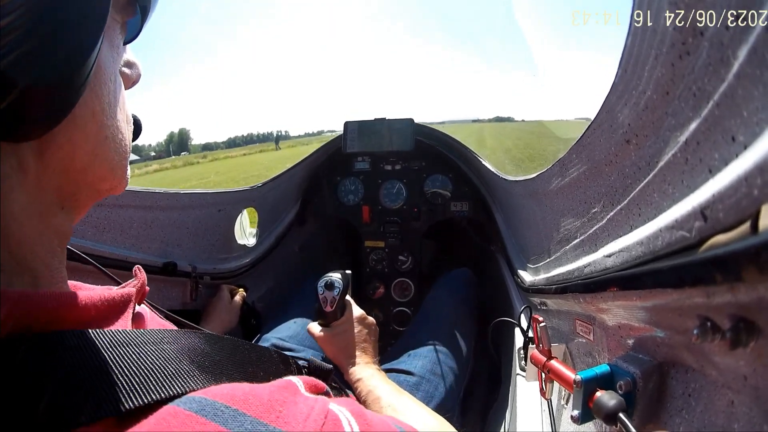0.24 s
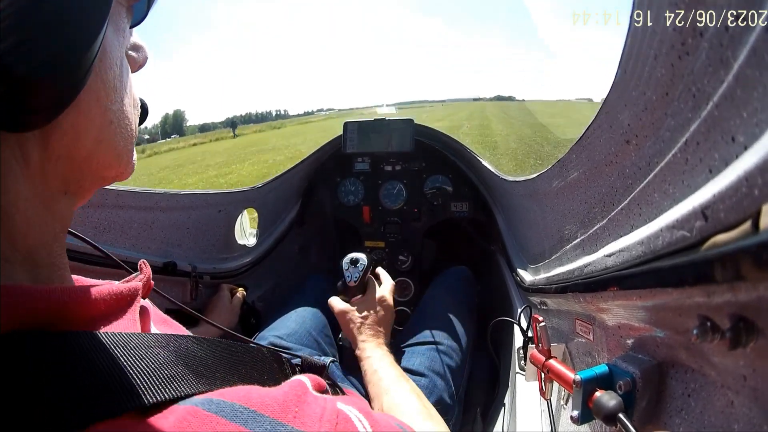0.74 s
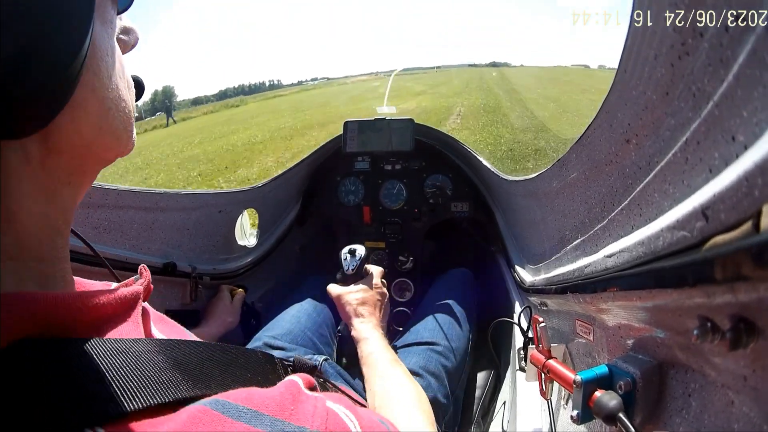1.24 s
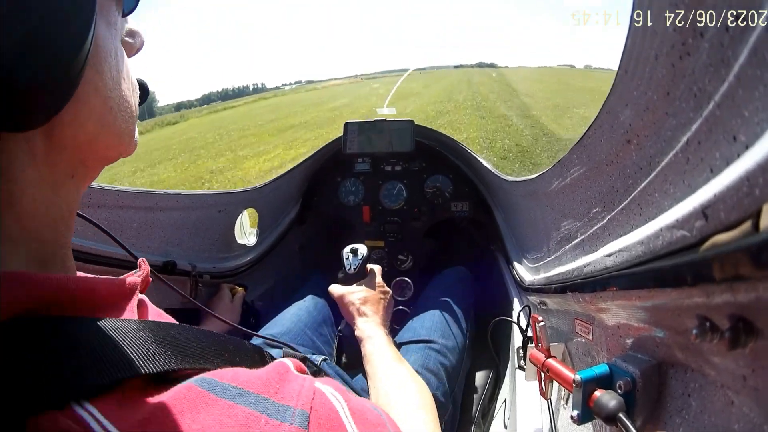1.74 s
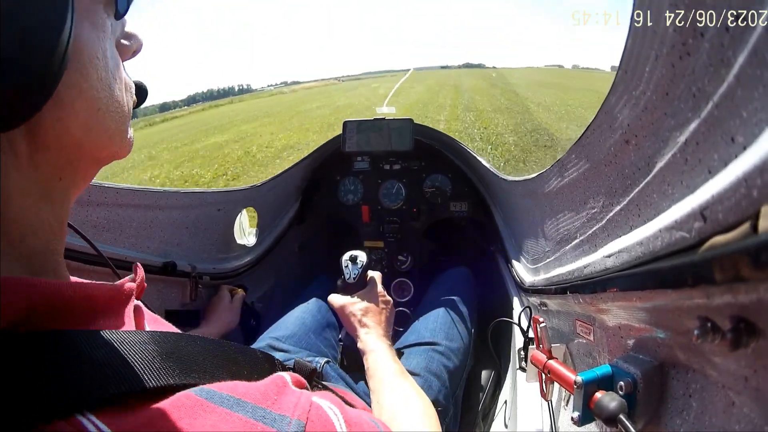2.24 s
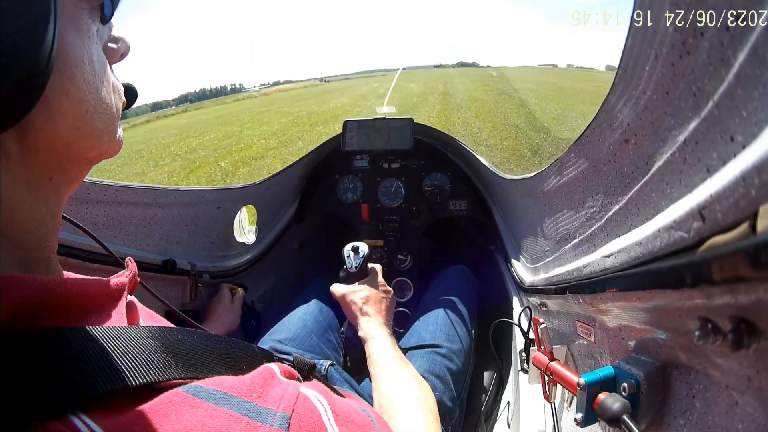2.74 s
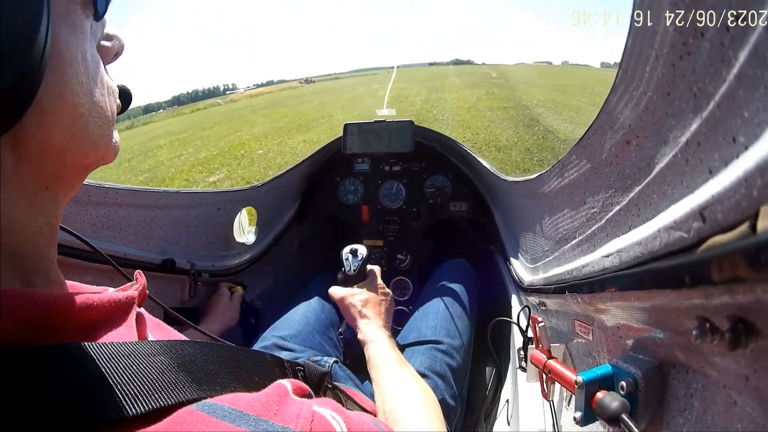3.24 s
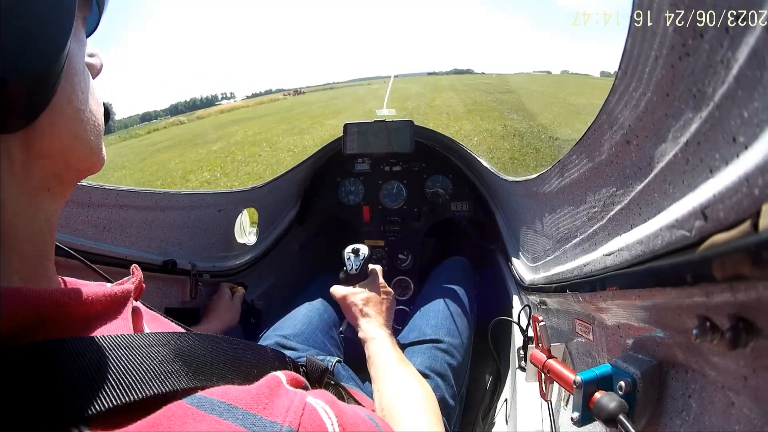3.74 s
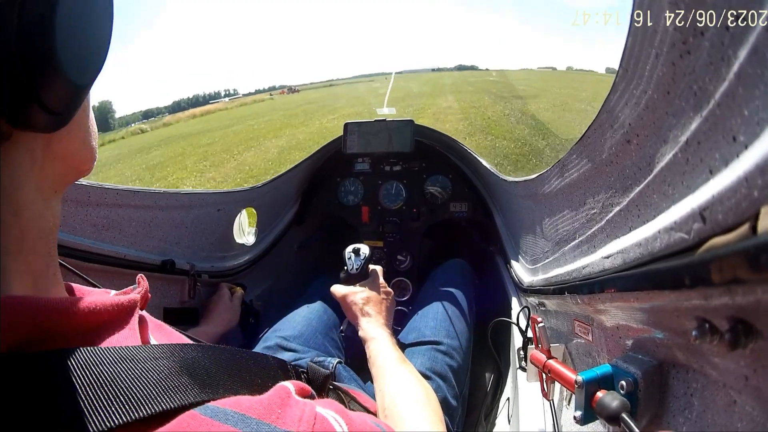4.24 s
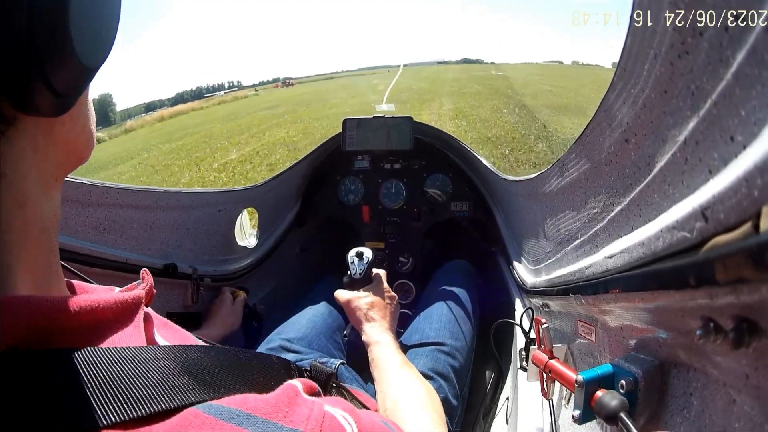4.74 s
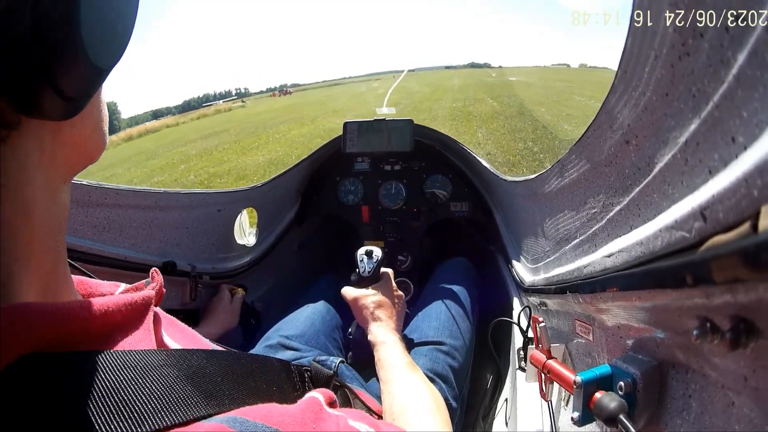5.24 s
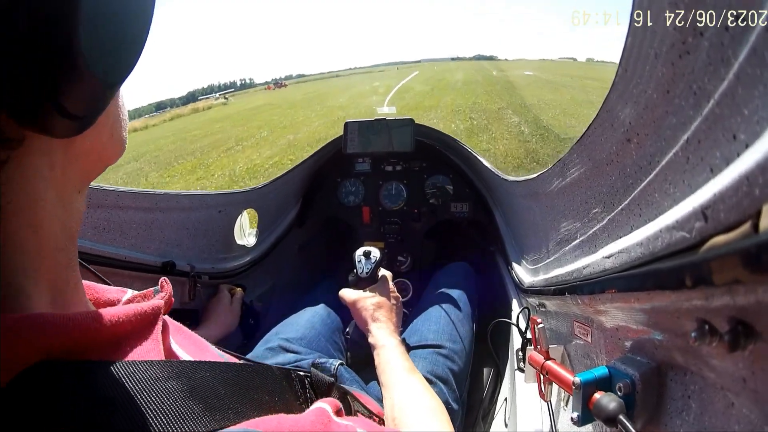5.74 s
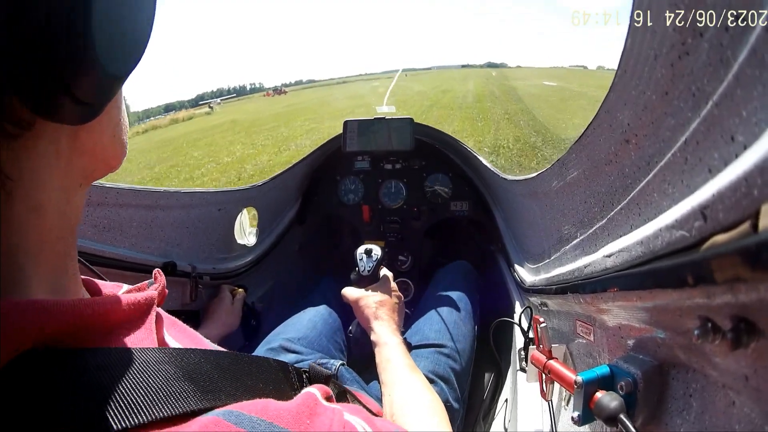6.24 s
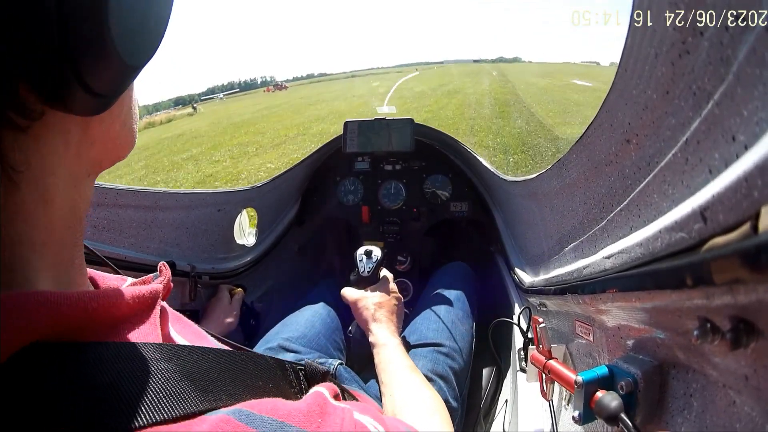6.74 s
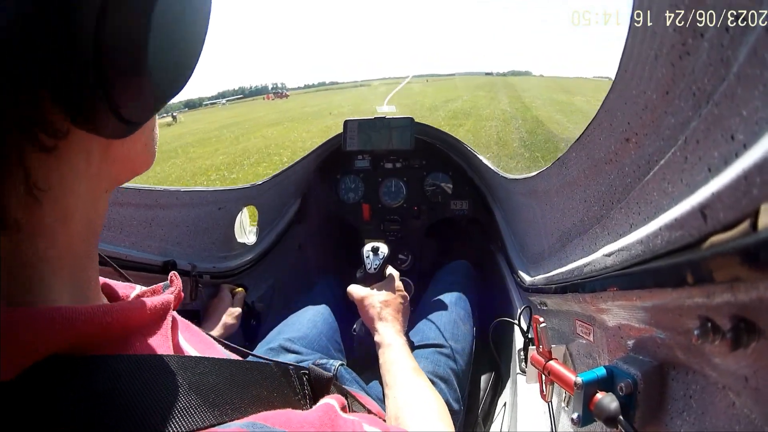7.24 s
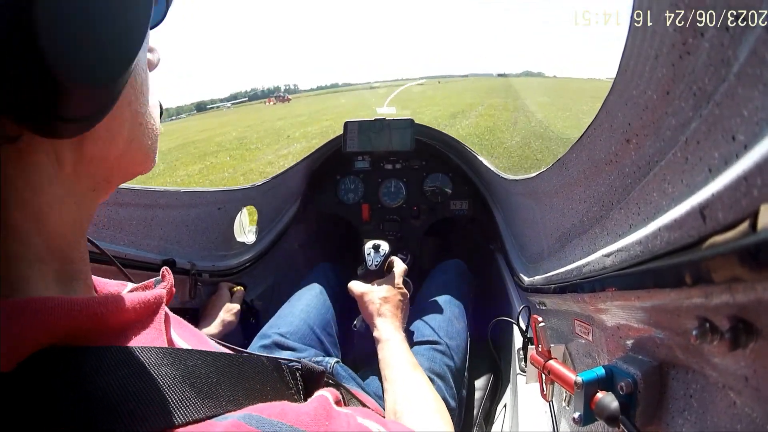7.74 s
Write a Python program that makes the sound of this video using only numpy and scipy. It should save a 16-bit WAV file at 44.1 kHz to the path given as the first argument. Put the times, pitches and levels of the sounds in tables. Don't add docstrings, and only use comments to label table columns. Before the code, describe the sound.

Inside a small aircraft cockpit rolling over rough grass, low rumble and wind rush, rapid loose rattling and hollow knocks, easing toward a sparse idle hum.

```python
import sys
import numpy as np
from scipy import signal
from scipy.fft import rfft, irfft
from scipy.io import wavfile
from scipy.ndimage import uniform_filter1d

SR = 44100
rng = np.random.default_rng(int(sys.argv[2]) if len(sys.argv) > 2 else 0)


def dump_mix(stems):
    frames = np.atleast_2d(stems).T
    limited = np.clip(frames, -1, 1)
    pcm = np.round(limited * 32767).astype(np.int16)
    wavfile.write(sys.argv[1], SR, pcm)


def elevation(decibels):
    levels = np.asarray(decibels, float)
    return 10 ** (levels / 20)


N = 352800


def evened(x):
    return x / np.sqrt(np.mean(x ** 2) + 1e-20)


def curves(rows):
    start_s, *columns = np.transpose(rows)
    return [np.interp(np.arange(N) / SR, start_s, column) for column in columns]


def drift(hz):
    lowpass = signal.butter(2, hz, fs=SR, output="sos")
    return evened(signal.sosfilt(lowpass, rng.standard_normal(N)))


def add(mix, start_s, sound):
    part = mix[max(round(start_s * SR), 0):][:len(sound)]
    part += sound[:len(part)]


def shaken(resonances):
    hz = np.fft.rfftfreq(N, 1 / SR)
    ring = 0
    for center_hz, width_hz, level_db in resonances:
        drive = rfft(rng.standard_normal(N))
        ring = ring + elevation(level_db) * drive / (1 + ((hz - center_hz) / width_hz) ** 2)
    return evened(irfft(ring, N))


def struck(modes, seconds, phases, contact_s):
    t = np.arange(round(seconds * SR)) / SR
    ring = 0
    for (hz, level_db, t60_s), phase in zip(modes, phases):
        ring = ring + elevation(level_db - 60 * t / t60_s) * np.sin(2 * np.pi * (hz * t + phase))
    return ring * np.sin(np.pi / 2 * np.minimum(t / (contact_s + 1e-6), 1)) ** 2


# middle_s, length_s, fuselage_rise_db, gear_rise_db
HUMPS = [(0, .2, -1.5, 11.5), (0.19, 0.067, 3.5, 3), (0.866, 0.74, -1, 2), (1.22, .3, 13, 8.5),
         (1.458, 0.3, -5.5, -9), (1.617, .16, 8.5, -19), (2.03, 0.52, 2, 7.5), (2.483, 0.13, 4, 11.5),
         (2.59, 0.46, 3.5, 2), (2.986, .18, 1, -1), (3.09, 0.29, -3.5, -14), (3.178, 0.16, 12, 2),
         (3.446, 0.098, 3, -2), (3.618, 0.18, -3.5, 2), (3.862, 0.33, 4.5, -5.5), (4.2, .2, 2, 0),
         (4.445, 0.083, 1.5, 0), (4.562, 0.13, 5, 0), (4.641, 0.15, -29, -1), (4.823, 0.14, 4.5, 16),
         (4.995, 0.26, 1, 8), (5.174, .3, 3, 6.5), (5.5, 0.15, -1, -4), (5.749, 0.16, 7.5, -16),
         (6.126, 0.22, -5.5, -17), (6.72, 0.17, 4.5, -1.5), (7.075, 0.39, 3, 4), (7.42, 0.9, -4, -0.5),
         (7.594, 0.22, 11, 3), (8, 0.31, -7, -2)]


def humps():
    t = np.arange(0, N, 64) / SR
    rise_db = 0
    for start_s, length_s, *peak_db in HUMPS:
        arch = np.cos(np.pi * np.clip((t - start_s) / length_s, -.5, .5)) ** 2
        rise_db = rise_db + np.outer(peak_db, arch)
    return [np.interp(np.arange(N) / SR, t, r) for r in rise_db]


# start_s, shake_db
SHAKE = [(0, -0.5), (.9, 0.5), (1.5, 1.5), (2.6, 0.5), (3.9, 0.5), (4.4, -2), (5.0, -.5), (5.5, -2.5),
         (6.2, -3), (7.0, -3.5), (8, -4)]


def loads(fuselage_db, gear_db):
    shake_db, = curves(SHAKE)
    boom_db = -25.5 + 1.56 * shake_db + fuselage_db
    thud_db = -32 + 0.77 * shake_db + gear_db
    rush_db = -25 + shake_db + 0.27 * fuselage_db
    wing_db = -27.5 + 1.3 * shake_db + 0.05 * fuselage_db + 0.49 * gear_db
    return boom_db, thud_db, rush_db, wing_db


# pitch_hz, density_db_per_hz
RUSH = [(30, -18), (100, -3.5), (240, -9), (420, -6), (600, -12), (900, -20), (1150, -22.5), (2000, -35),
        (2900, -56.5), (4000, -58), (6000, -68.5)]


def rush():
    frames, hz = N // 128 + 8, np.fft.rfftfreq(512, 1 / SR)
    real, imag, patches = rng.standard_normal((frames, len(hz), 3)).T
    patches = uniform_filter1d(patches, size=5, axis=0)
    patches = evened(uniform_filter1d(patches, size=14, axis=1))
    pitch_hz, density_db = np.transpose(RUSH)
    slope_db = np.interp(np.log(hz + 1), np.log(pitch_hz), density_db)[:, None]
    spectrum = (real + 1j * imag) * elevation(slope_db + 1.88 * patches)
    return evened(signal.istft(spectrum, nperseg=512, noverlap=384)[1][:N])


# center_hz, width_hz, level_db
AIRFRAME = [(184.9, 16.5, 2), (240.2, 43, 0.5), (303, 9.3, -15)]
# center_hz, width_hz, level_db
GEAR = [(36.5, 31, -5), (50.3, 11, -2.5)]
# center_hz, width_hz, level_db
WING = [(117, 26, 0.5)]


def rolling():
    boom_db, thud_db, rush_db, wing_db = loads(*humps())
    jolts = drift(hz=23.7)
    boom = elevation(boom_db + 2.8 * jolts) * shaken(AIRFRAME)
    drum = elevation(wing_db) * shaken(WING)
    thud = elevation(thud_db) * shaken(GEAR)
    return boom + drum + thud + elevation(rush_db + jolts) * rush()


# start_s, rate_hz, hum_db
ENGINE = [(0.0, 84.02, -25), (0.98, 83.37, -25), (2.47, 80.77, -23.5), (3.2, 75.98, -26.5),
          (3.36, 74.4, -34), (3.52, 70.43, -20), (3.62, 73.43, -40), (3.94, 70.38, -26), (4.45, 69.43, -39),
          (4.79, 69.06, -31.5), (5.57, 69.86, -36), (5.7, 73, -30), (5.9, 73.8, -30), (7.08, 67.94, -34.5),
          (7.69, 71.7, -35), (8.0, 72.6, -32.5)]


def engine():
    hz, hum_db = curves(ENGINE)
    turns = np.cumsum(hz * (1 + 0.014 * drift(hz=18)) / SR)
    idle_hz, half_db_per_hz, wander_db = 73, -0.77, 4.5
    half_db = -2 + half_db_per_hz * (hz - idle_hz) + wander_db * drift(hz=4)
    firing = np.sin(2 * np.pi * turns) + elevation(half_db) * np.sin(np.pi * turns)
    return np.sqrt(2) * elevation(hum_db) * firing


# start_s, pitch_hz, level_db
HOP = [
    (1.4, 48.0, -37),
    (1.472, 46, -25),
    (1.623, 51.47, -34),
    (2.594, 50.56, -24),
    (2.85, 46.4, -45),
]


def tyre():
    hz, level_db = curves(HOP)
    t = np.arange(N) / SR
    fade_s = 0.13
    gate = np.clip(np.minimum(t - HOP[0][0], HOP[-1][0] - t) / fade_s, 0, 1)
    return np.sqrt(2) * gate * elevation(level_db) * np.sin(2 * np.pi * np.cumsum(hz) / SR)


# start_s, blow_db, panel_hz, fuselage_share_db, brightness_db_per_octave
KNOCKS = [(1.181, -23, 520, -1, -8), (1.6, -12.5, 563, 5, -25), (2.435, -10.5, 603, 5, -8),
          (2.55, -13.5, 633, -8, -9), (3.126, -9.5, 522, -5, -6), (3.753, -10, 618, 3, -13.5),
          (3.818, -4, 540, 1.5, -4.5), (4.261, -21.5, 688, 19, -4), (4.561, -18.5, 657, 11.5, -9),
          (4.778, -16, 526, 6.5, 2), (4.802, -17.5, 778, 3, -3), (5.123, -9, 567, 5, -2),
          (5.139, -11, 543, 0.5, 2.5), (5.751, -16, 612, 12, -0.5), (5.897, -19.5, 576, 7, -2.5),
          (7.111, -8, 572, 3, -3), (1.157, -11, 480, 13, -10), (3.681, -22.5, 910, -19, 0),
          (6.853, -18, 1065, 3.5, -23), (2.172, -19.5, 530, 3, -6), (4.905, -21.5, 550, -1, -5),
          (6.176, -22, 552, 4, 0), (6.664, -27, 1065, 4, -16), (6.719, -21, 560, 7, -7)]
# pitch_factor, level_db, t60_s
PANEL = [(1.009, 1.5, 0.039), (1.39, -2.5, 0.04), (1.94, 0, 0.021), (4.2, -17, 0.0092)]
# pitch_hz, level_db, t60_s
SHELL = [(205.4, -3, 0.32), (244.8, 7, 0.075)]


def knocks():
    out = np.zeros(N)
    for start_s, blow_db, panel_hz, shell_db, bright_db in KNOCKS:
        modes = [(panel_hz * k, level_db + bright_db * np.log2(k), t60_s) for k, level_db, t60_s in PANEL]
        slap = struck(modes, 0.06, np.zeros(len(modes)), contact_s=0.0016)
        add(out, start_s - 0.0007, elevation(blow_db - 0.5) * slap)
        rebound_s = 0.00534 + 0.0032 * rng.random()
        add(out, start_s + rebound_s, -elevation(blow_db - 6.5) * slap)
        shell = struck(SHELL, 0.18, rng.random(len(SHELL)), contact_s=0.0065)
        add(out, start_s, elevation(blow_db + shell_db - 7.5) * shell)
    return out


# start_s, level_db
SNAPS = [(1.0613, -54), (1.183, -40), (1.5529, -51), (1.8522, -55.5), (2.007, -47), (2.7823, -51),
         (4.258, -56), (4.4035, -50), (4.9563, -50.5), (4.997, -55), (5.0365, -50), (5.0626, -51)]


def buckle():
    out, t = np.zeros(N), np.arange(600) / SR
    t60_s = 0.004
    for start_s, level_db in SNAPS:
        click = elevation(level_db + 6 - 60 * t / t60_s) * rng.standard_normal(len(t))
        add(out, start_s + 0.001, click)
    return signal.sosfilt(signal.butter(4, 9500, "high", fs=SR, output="sos"), out)


# start_s, tap_db, lead_in_s, tail_s
RATTLES = [(.0088, -26, 0, 0.063), (.2267, -28.5, 0.083, 0.0018), (.3447, -31.5, .058, 0),
           (.3694, -27, 0.0059, 0.02), (.4394, -28.5, 0.0022, .015), (.524, -36.5, .025, 0.029),
           (.6429, -27.5, 0.045, 0.016), (.6666, -27.5, 0, .03), (.7194, -28, 0.024, .015),
           (.845, -26.5, 0.053, .025), (.9453, -31.5, .035, .025), (1.0898, -30.5, 0.038, .025),
           (1.1838, -22.5, 0.019, 0.0029), (1.2093, -29.5, 0, .017), (1.2921, -31, 0.035, 0.012),
           (1.3222, -30.5, 0, .12), (1.5222, -27.5, 0.044, .07), (1.7817, -35.5, 0.15, .1),
           (1.9307, -29.5, 0.022, 0), (2.0061, -30, 0.016, 0.05), (2.1254, -27, 0.022, 0.0097),
           (2.2229, -27.5, 0.033, 0.025), (2.298, -29.5, 0.025, .022), (2.3389, -29.5, 0, 0),
           (2.467, -29.5, 0.034, 0.046), (2.5189, -23.5, 0.022, 0.0019), (2.5948, -29.5, 0.061, .037),
           (2.7004, -29, 0.0092, 0), (2.7955, -26.5, 0.025, 0.086), (2.927, -32.5, 0.025, .027),
           (3.0426, -27, .025, .036), (3.1372, -28.5, .03, 0.028), (3.2455, -25, .029, 0.025),
                (3.46, -28, .087, 0), (3.5323, -28, .014, .025), (3.6519, -29, 0.043, .03),
                (3.6962, -29.5, 0.032, 0.1), (3.8334, -28, 0.012, 0.086), (4.1037, -33, 0.027, .055),
                (4.2352, -28, 0.1, 0.039), (4.4044, -26, 0, 0.0071), (4.5751, -29, .085, .048),
                (4.8031, -27.5, 0.11, 0.014), (4.898, -29, 0.061, 0.012), (4.932, -28, 0.01, .05),
                (5.037, -24.5, 0.049, 0), (5.0636, -25.5, 0.0055, 0), (5.1412, -29, 0.026, .077),
                (5.33, -36, .09, 0.048), (5.4408, -29, 0, 0.0074), (5.6655, -33.5, 0.038, 0.096),
                (5.8407, -30.5, 0.0073, 0.07), (6.2814, -30, 0, 0.043), (6.4035, -39.5, 0.035, .027),
                (6.544, -33, 0, .04), (7.0545, -37.5, 0, .037), (7.145, -34.5, 0.0059, 0.029),
                (7.321, -33.5, .044, 0.0014), (7.6118, -33.5, .042, 0.085), (7.7903, -33.5, 0.017, 0.0093)]
# start_s, tap_db
STRAY_TAPS = [(.0406, -33.5), (0.1774, -32.5), (0.2967, -32.5), (0.7982, -36.5), (1.0626, -30),
              (1.4981, -27), (1.555, -31), (1.905, -27.5), (2.4275, -36), (2.8614, -32.5), (3.1588, -25.5),
              (3.3772, -34.5), (3.421, -30), (3.8998, -33.5), (4.3184, -33.5), (4.4529, -31),
              (4.7794, -24.5), (4.9983, -28.5), (5.18, -34.5), (5.2168, -37.5), (5.7437, -38),
              (5.9736, -42), (6.0238, -39), (6.2429, -34.5), (6.2688, -30.5), (7.2784, -41.5),
              (3.216, -27.5), (6.2533, -32), (7.1693, -38.5), (7.7097, -42.5)]


def taps(count=9):
    bursts = np.array(RATTLES)
    start_s, tap_db, lead_s, tail_s = np.transpose(bursts)[:, :, None]
    beat = np.arange(-count, count + 1)
    slip, spread = rng.standard_normal((2, len(start_s), len(beat)))
    taps_per_beat, jitter_s = 0.99, 0.0012
    rate_hz = taps_per_beat * np.interp(start_s, *np.transpose(ENGINE)[:2])
    away_s = beat / rate_hz + jitter_s * np.sqrt(abs(beat)) * slip
    outside_s = np.maximum(-lead_s - away_s, away_s - tail_s)
    beyond_s = np.maximum(outside_s - 0.2 / rate_hz, 0)
    next_tap_db, odd_tap_db, spread_db = -2, -0.5, 7.5
    sag_db_per_s, stop_db_per_s = 35, 1500
    weaker_db = next_tap_db + odd_tap_db * (beat % 2) - spread_db * abs(spread) ** 1.3
    weaker_db = weaker_db - sag_db_per_s * abs(away_s) - stop_db_per_s * beyond_s
    to_stray_s = abs((start_s + away_s)[..., None] - np.transpose(STRAY_TAPS)[0]).min(-1)
    weaker_db = weaker_db - 40 * (to_stray_s < 0.006)
    level_db = tap_db + (beat != 0) * weaker_db
    return np.transpose([(start_s + away_s).ravel(), level_db.ravel()])


# pitch_hz, level_db, t60_s
LATCH = [(874, 9.5, 0.006), (1620, 6.5, 0.0041), (2220, -17.5, 0.03), (3344, -1.5, 0.0076),
         (4014, -6, 0.007), (5120, -7, 0.0035), (6050, -21, 0.0098), (8100, -27, 0.0067),
         (9000, -24.5, .003), (12900, -23.5, 0.0016)]


def chatter(out):
    per_s, level_db = 500, -55.5
    busy = evened(uniform_filter1d(np.abs(out), size=6000))
    fuselage_db, _ = humps()
    hits = (rng.random(N) < per_s / SR) * rng.standard_normal(N) ** 2
    hits = hits * (0.31 + busy) * elevation(0.5 * fuselage_db)
    tap = struck(LATCH, 0.012, np.zeros(len(LATCH)), contact_s=0.0003)
    return elevation(level_db) * signal.oaconvolve(hits, tap)[:N]


def canopy(out):
    t = np.arange(2500) / SR
    t60_s = 0.017
    tail = rng.standard_normal(len(t)) * elevation(-60 * t / t60_s) * (t > 0.001)
    return elevation(-22) * signal.oaconvolve(out, tail / np.linalg.norm(tail))[:N]


def ticks():
    out = np.zeros(N)
    for start_s, tap_db in np.concatenate([taps(), STRAY_TAPS]):
        if tap_db < -65 or start_s < 0:
            continue
        tune, weight, phase = rng.standard_normal((3, len(LATCH)))
        modes = [(hz * (1 + 0.025 * a), level_db + 0.5 * w, t60_s)
                 for (hz, level_db, t60_s), a, w in zip(LATCH, tune, weight)]
        contact_s = 0.00034 * elevation(-0.3 * (tap_db + 30.5) + 2 * phase[1])
        tap = np.sign(phase[0]) * struck(modes, 0.012, 0.14 * phase, contact_s)
        add(out, start_s - 0.0004, elevation(tap_db + 4.5) * tap)
    out += chatter(out)
    return out + canopy(out)


def scene():
    return (rolling() + engine() + tyre() + knocks() + buckle() + ticks())[None]


def top_cut(x):
    return signal.sosfilt(signal.butter(12, 15830, fs=SR, output="sos"), x)


def record(dry):
    thin = signal.sosfilt(signal.butter(3, 27, "high", fs=SR, output="sos"), dry)
    soft = np.tanh(thin)
    hiss = signal.lfilter([1, 0.15], 1, rng.standard_normal(dry.shape))
    return top_cut(soft + elevation(-75.5) * hiss)


dry = scene()
out = record(dry)
dump_mix(out)
```